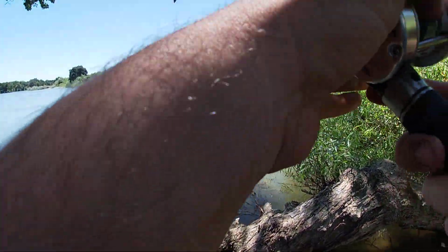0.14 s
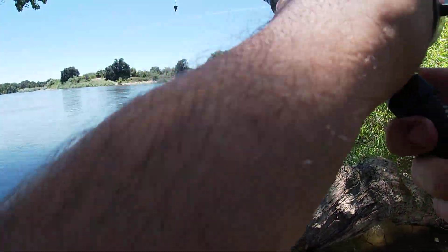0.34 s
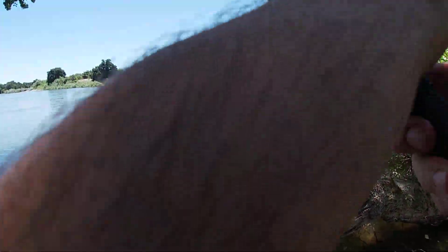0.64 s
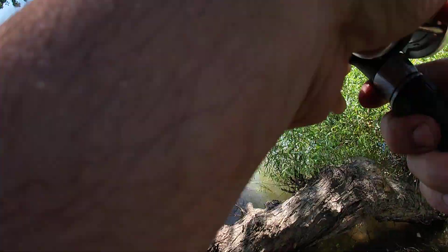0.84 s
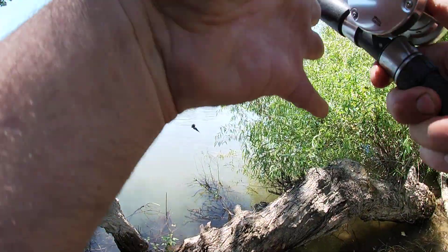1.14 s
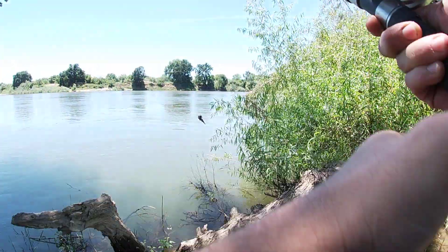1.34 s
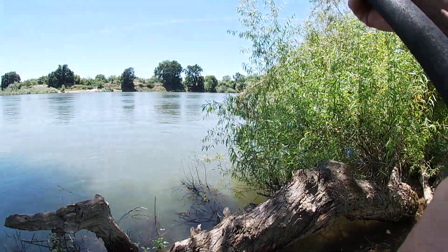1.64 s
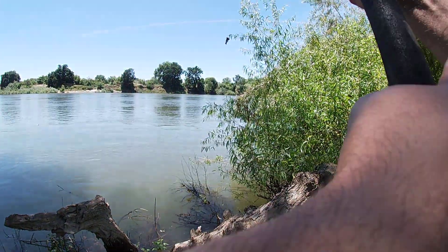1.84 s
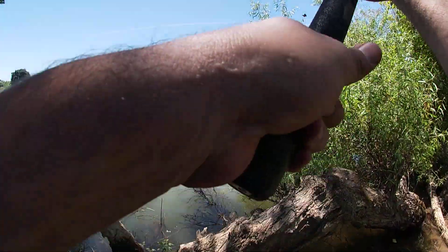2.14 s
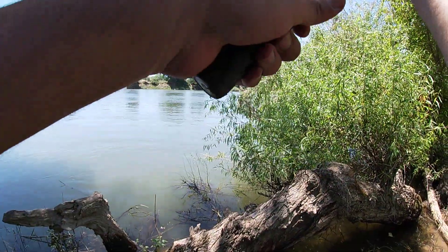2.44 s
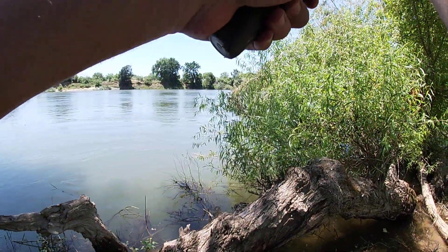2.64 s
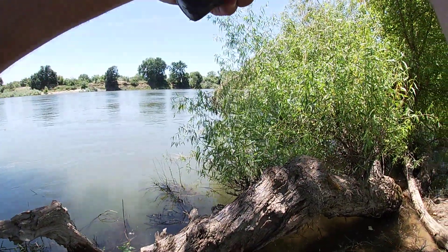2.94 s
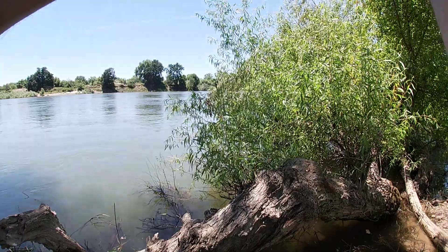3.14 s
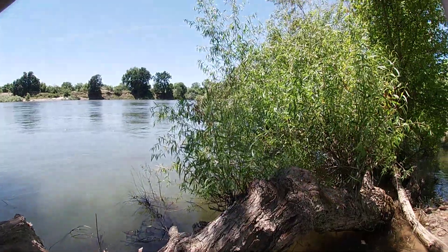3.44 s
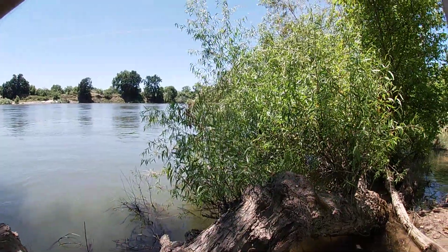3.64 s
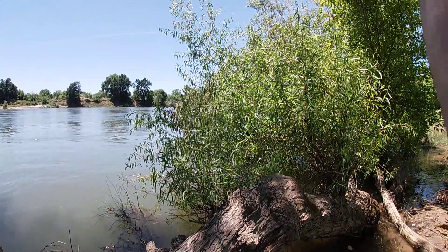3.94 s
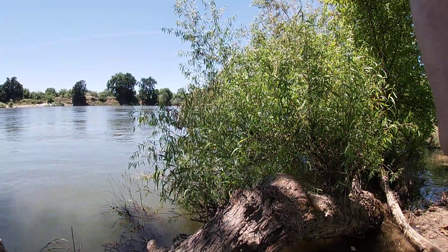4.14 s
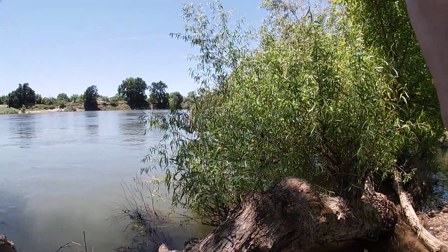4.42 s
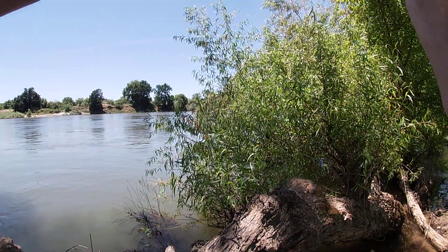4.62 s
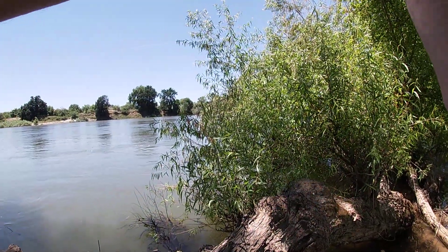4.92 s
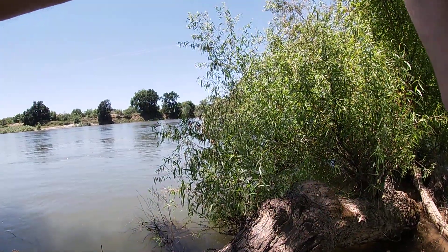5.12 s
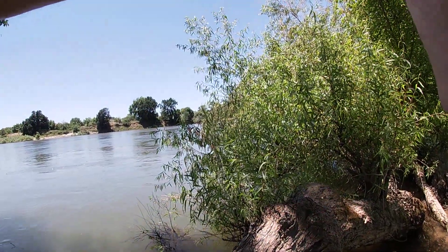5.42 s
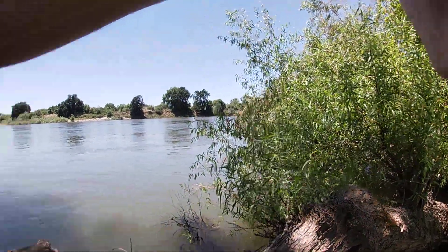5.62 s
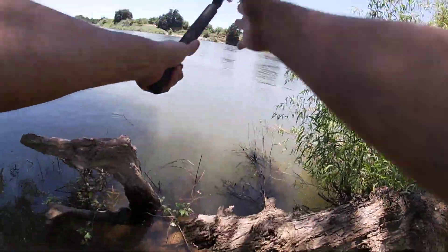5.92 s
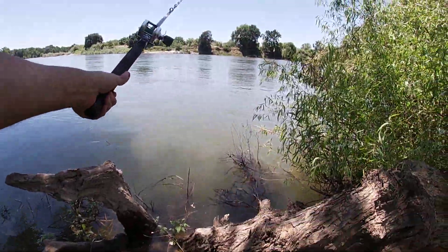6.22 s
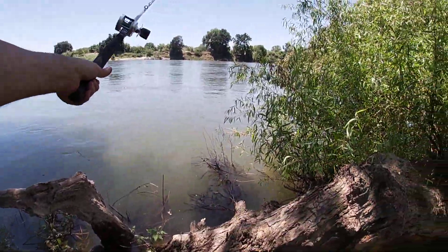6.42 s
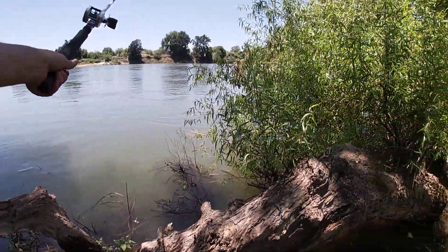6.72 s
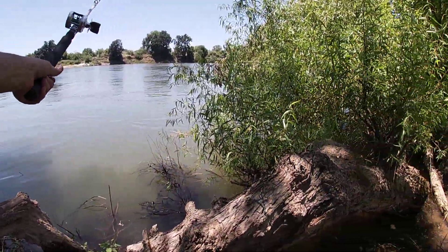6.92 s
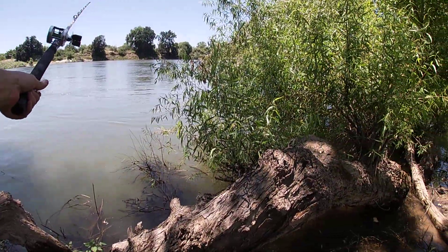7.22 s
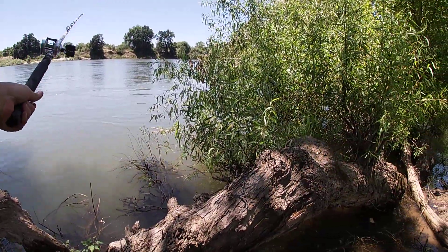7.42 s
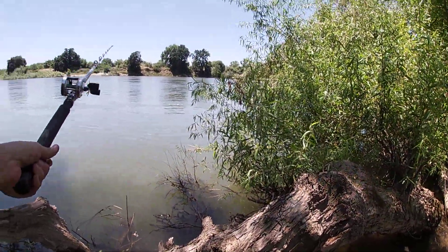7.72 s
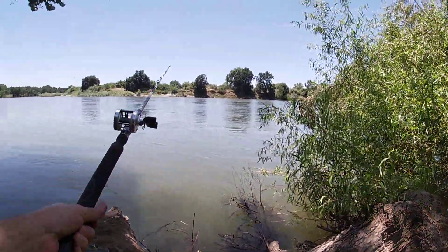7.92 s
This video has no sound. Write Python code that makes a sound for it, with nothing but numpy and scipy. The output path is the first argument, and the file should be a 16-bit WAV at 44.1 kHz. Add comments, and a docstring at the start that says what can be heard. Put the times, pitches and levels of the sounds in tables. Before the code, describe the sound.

Hands click on a fishing reel, then the rod whooshes and the spool whines, slowly falling in pitch, beside a river.

```python
"""The free spool of a fishing reel whines as it slows after a riverside cast: its gears and bearings make
tones at multiples of the rotation rate, and the metal frame radiates them through its resonances.
Before that, hands rub and tick on the reel, and the swung rod whooshes through the air.
Behind it a distant engine drones in three harmonics over wind rumble, river hiss, a faint whistle
and a thin insect band. One microphone hears it all."""
import sys
import numpy as np
from scipy import signal
from scipy.fft import rfft, irfft
from scipy.io import wavfile
from scipy.ndimage import uniform_filter1d

SR = 44100
rng = np.random.default_rng(int(sys.argv[2]) if len(sys.argv) > 2 else 0)


def bounce(signal):
    """Save signal as a 16-bit WAV file at the path given by the first command-line argument."""
    frames = np.transpose(np.atleast_2d(signal))
    limited = np.clip(frames, -1, 1)
    pcm = np.round(limited * 32767).astype(np.int16)
    wavfile.write(sys.argv[1], SR, pcm)


N = 355490
TIME = np.arange(N) / SR

# Spool speed jumps at release, then sags in shrinking surges as the rod tip nods.
# Each row: time in seconds, gear mesh frequency in Hz, mesh tone level in dB.
GEAR_MESH = [(5.97, 2800, -62), (6.01, 2950, -58), (6.04, 3650, -50), (6.07, 3990, -44), (6.1, 3944, -47),
             (6.18, 3556, -52), (6.26, 3210, -57), (6.33, 3070, -49), (6.38, 2967, -52), (6.46, 3230, -59),
             (6.51, 3400, -55), (6.56, 3270, -58), (6.6, 3138, -50), (6.65, 2990, -52), (6.76, 3133, -54),
             (6.95, 2793, -52), (7.09, 2894, -53), (7.22, 2685, -53), (7.3, 2712, -55), (7.42, 2670, -57),
             (7.59, 2598, -52), (7.73, 2655, -55), (7.86, 2604, -50.5), (8, 2630, -53), (8.06, 2470, -50)]
# Spool noise. Each row: time in seconds, whirr level in dB, sizzle and rasp in dB against the whirr.
SPOOL_NOISE = [(5.97, -43, -6, -10), (6.03, -42.5, -8, -3), (6.09, -40, -4, -2), (6.14, -42.5, -9, -2.5),
               (6.31, -44, -7, -3.5), (6.37, -46.5, -7, -4), (6.47, -44.5, -3.5, -4.5),
               (6.63, -47, 0, -2.5), (6.68, -46.5, -3.5, -2), (6.82, -46.5, -0.5, -2),
               (6.86, -50, -1, -1.5), (6.92, -48, 0, -2), (7.05, -48, 0, -3.5), (7.28, -51, -1.5, -2.5),
               (7.41, -50.5, 1.5, 0.5), (7.52, -52.5, -1.5, -3.5), (7.64, -50, 0.5, -0.5),
               (7.75, -49.5, -9, -6), (7.86, -49, -6, -1.5), (7.97, -46.5, -5, -1), (8.06, -48.5, -9, 0)]
# Resonances of the reel frame. Each row: centre in Hz, width in Hz, gain in dB.
FRAME_MODES = [(1290, 930, -1.5), (2896, 960, 9), (5560, 1300, 4), (8250, 1800, 3.5), (9820, 1100, 4.5),
               (13600, 2800, -2)]
# Bearing tones, idler gear, then clusters round mesh harmonics 2 to 4. Each entry: cycles per spool turn.
WHINE_ORDERS = [10.08, 15.12, 26 / 3, 52 / 3, 65 / 3, 104 / 3, 25, 26, 27, 39, 40, 41, 42, 50, 52, 53]
# Strength of those orders. Each row: relative level in dB, dB gained per octave of spool speed.
WHINE_LEVELS = [(-61, 32), (-62, -15), (-67, -25), (-61, 15), (-64, -45), (-65, -15), (-64, 12), (-62, 12),
                (-63, 12), (-61, -5), (-62, -5), (-66, 6), (-68, 12), (-79, -35), (-74, -35), (-74, -35)]
# Bands where the frame radiates the whine best. Each row: centre in Hz, width in Hz, gain in dB.
RADIATION_BANDS = [(2800, 1000, 0.1), (4400, 700, -1), (5300, 500, -3), (6550, 800, 5), (8300, 700, -4),
                   (10100, 500, 7)]
# Thin metal rings. Each row: resonance in Hz, width in Hz, level in dB.
RING_MODES = [(4468, 130, -64), (6950, 150, -67), (10148, 150, -68), (11660, 100, -72), (12322, 80, -76)]
# Onset of each ring. Each entry: start in seconds.
RING_STARTS = [6.9, 6.4, 6.2, 6.88, 6.88]
# Loose gears. Each row: time in seconds, levels in dB near the 2nd and the 3rd mesh harmonic.
GEAR_CHATTER = [(6.0, -59, -70), (6.08, -55, -68), (6.2, -64, -64), (6.3, -53, -63), (6.4, -53, -66),
                (6.5, -49, -62), (6.58, -51, -64), (6.7, -57, -59), (6.9, -62, -61), (7.2, -72, -59),
                (7.6, -66, -55), (8.06, -61, -60)]
# The rod's throw and rebound. Each row: time in seconds, level of the hollow whoosh in dB.
ROD_SWING = [(5.6, -65), (5.69, -55.5), (5.74, -41), (5.78, -49), (5.84, -43.5), (5.87, -50), (5.97, -51),
             (6.05, -44.5), (6.1, -45), (6.15, -53), (6.22, -51.5), (6.4, -67)]
# Ticks of fingers and clutch. Each row: start in seconds, crack peak in dB, centre in Hz,
# treble gain in dB, thud in dB against the peak, time to decay by 60 dB in seconds.
REEL_TICKS = [(0.1053, -34.5, 3670, -14, 5, 0.026), (0.264, -45, 7000, -3, -20, 0.013),
              (0.4708, -38.5, 3000, -9, -13, 0.011), (0.554, -42, 2000, -21, 1, .012),
              (0.613, -12.5, 2070, -17, -22, 0.014), (0.615, -2, 3870, 9, -30, 0.0057),
              (0.6148, -19, 8540, -12, -30, 0.0053), (0.6171, -11.5, 1160, -17.5, -11, 0.012),
              (0.76, -47, 2600, -22, -15, .012), (0.784, -28.5, 1560, -13, -11, 0.026),
              (0.843, -37, 1800, -15, -15, 0.0099), (0.917, -37, 1300, -17, -17, 0.016),
              (0.924, -45, 2700, -14, -15, .012), (0.951, -43, 1600, -20, -15, 0.011),
              (0.957, -42, 1700, -20, -15, .012), (1.005, -47, 1500, -20, -15, .012),
              (1.015, -43, 1810, -12, 10, 0.011), (1.042, -29, 4230, -28, -25, 0.0081),
              (1.075, -38, 4400, -15, -23, .012), (1.092, -37, 4300, -12, -20, .012),
              (1.0423, -26, 1620, -36, -12, 0.0055), (1.072, -29, 1520, -37, -17, .014),
              (1.11, -34, 4300, -16, -5, 0.021), (1.129, -25.5, 4300, -9, -4, 0.022),
              (1.131, -25, 2720, -4, 3, 0.052), (1.159, -27.5, 3850, -30, -27, 0.018),
              (1.171, -33, 2500, -23, -15, 0.02), (1.1895, -37, 1700, -28, -18, 0.012),
              (1.2942, -41, 4170, -2, -7, 0.0087), (2.0714, -40.5, 1380, -19, -20, 0.012),
              (2.0795, -40.5, 4330, -19, -7, 0.021), (2.118, -39.5, 1310, -22, 7.5, 0.0034),
              (3.346, -42, 7800, -12, -20, 0.02), (3.462, -38, 2700, -28, -10, 0.012),
              (3.463, -43, 1250, -28, -10, .012), (3.696, -34, 2010, -7, 5, 0.015),
              (4.208, -39, 2900, -20, -10, 0.012), (4.2085, -44, 1320, -25, -5, .012),
              (4.306, -45, 2900, -28, -20, .012), (5.724, -30, 1210, -25, -21, 0.017),
              (5.735, -38, 9000, -10, -25, .008), (5.745, -38, 11500, -10, -29, .008),
              (5.756, -21.5, 1240, -36, -15, 0.0061), (5.7842, -33, 9000, -12, -20, .01),
              (5.819, -20, 7360, 14, -21, 0.011), (5.8793, -29, 4300, 0, -22, 0.011),
              (5.87, -35, 10500, -8, -25, .01), (5.917, -32, 7260, -3, -12, 0.032),
              (5.918, -36, 13000, -15, -25, .012), (5.975, -26, 7360, -15, -20, 0.0067),
              (5.9748, -28, 3500, -15, -20, .008)]
# The reel's side plate, rung by every tick. Each row: centre in Hz, width in Hz, relative gain in dB.
PLATE_MODES = [(400, 60, 0), (800, 59, 11), (1710, 300, -4), (3800, 340, -3), (4500, 120, -17),
               (7340, 240, -33)]
# Wide noise swells: short rubs of skin and cloth, a faint high background sheen, and a long swell
# of river hiss. Each row: start in seconds, length in seconds, centre in Hz, level in dB.
NOISE_SWELLS = [(0, 0.027, 3480, -47.5), (0, 0.051, 690, -44.5), (0.018, 0.08, 6970, -82),
                (0.12, 0.074, 5370, -51.5), (0.183, 0.18, 3440, -59.5), (0.105, .24, 10400, -67),
                (0.642, 0.44, 10700, -62), (.616, 0.039, 736, -46.5), (.617, 0.036, 4020, -53),
                (0.66, 0.087, 6160, -55), (0.669, 0.066, 2620, -55.5), (0.617, 0.017, 300, -35.5),
                (0.78, 0.062, 5270, -55), (0.84, 0.043, 6000, -59), (0.904, 0.074, 1520, -63),
                (0.952, 0.054, 7200, -60), (1.095, 0.061, 6960, -60), (1.127, 0.016, 220, -40),
                (1.121, 0.013, 4500, -48), (1.682, 0.054, 7350, -51), (1.734, 0.09, 6940, -61),
                (1.894, 0.068, 4800, -52.5), (2.095, 0.21, 3880, -60.5), (3.342, 0.055, 7560, -48),
                (3.344, .045, 3300, -55), (3.521, 0.087, 8000, -65), (3.692, 0.035, 6000, -62),
                (4.12, 0.042, 7030, -60.5), (4.22, 0.073, 5770, -58.5), (4.301, 1.9, 3600, -62)]
# Line and thumb on the spool. Each row: start in seconds, length in seconds, centre in Hz, level in dB.
LINE_SQUEAKS = [(0, 0.048, 1750, -41.5), (0.597, 0.035, 5600, -48), (0.792, 0.03, 3700, -57),
                (0.852, 0.04, 3760, -49.5), (0.902, 0.028, 8300, -61), (5.758, 0.039, 5600, -50),
                (5.909, 0.018, 4240, -48.5), (5.926, 0.041, 4420, -48), (0.941, 0.091, 4330, -59),
                (1.037, .013, 6200, -55), (1.052, 0.013, 6200, -57), (1.064, 0.059, 7100, -63),
                (1.147, .02, 6870, -60), (0.787, 0.02, 5650, -61), (0.848, .04, 5300, -59),
                (0.849, 0.033, 7000, -64), (0.97, 0.031, 6450, -62), (0.962, .035, 8050, -64),
                (0.96, 0.041, 1610, -58.5), (1.085, 0.035, 1670, -54), (3.353, 0.044, 1320, -51.5),
                (3.886, 0.025, 1210, -55.5), (4.083, 0.014, 1340, -56), (7.619, 0.2, 1330, -59)]
# The engine's fundamental swells and fades as the air moves. Each row: time in seconds, level in dB.
ENGINE_FUNDAMENTAL = [(0.0, -44.5), (0.49, -34), (0.65, -50.5), (0.94, -33), (1.1, -53), (1.14, -35),
                      (1.28, -56), (1.46, -36.5), (2.02, -38), (2.11, -46.5), (2.31, -33.5), (2.69, -68),
                      (2.8, -41.5), (3.57, -46), (3.7, -30.5), (3.77, -45), (3.88, -30), (4.15, -57),
                      (4.18, -43.5), (4.44, -42.5), (4.67, -59), (4.74, -40), (4.98, -29.5), (5.5, -44.5),
                      (6.02, -40), (6.06, -71), (6.24, -42.5), (6.71, -49), (6.8, -36), (7.07, -38.5),
                      (7.16, -30), (7.39, -39), (7.59, -29), (8.06, -50)]
# Its second harmonic swells on its own. Each row: time in seconds, level in dB.
ENGINE_SECOND = [(0, -54), (1.2, -62.5), (2.9, -53), (3.5, -54.5), (4.45, -53.5), (4.6, -42), (4.9, -43),
                 (5.0, -54), (5.15, -41), (5.35, -48), (5.5, -52.5), (6.6, -57), (6.75, -47.5), (7.0, -71),
                 (7.5, -54), (8.06, -54)]
# Gusts on the microphone. Each row: time in seconds, gust strength in dB.
GUSTS = [(0.0, -49), (0.52, -51), (2.69, -52), (3.61, -41), (4.06, -53.5), (4.56, -37.5), (4.65, -53),
         (5.68, -44), (5.75, -30), (5.84, -38), (5.97, -41), (6.84, -49.5), (6.87, -37.5), (7.43, -47),
         (7.54, -35), (7.59, -40), (8.06, -42)]
# Spectrum of the river. Each row: frequency in Hz, relative gain in dB.
RIVER_SPECTRUM = [(60, -15.5), (110, -9), (200, -7), (300, -14), (550, -19.5), (1000, -26), (1400, -29.5),
                  (2200, -34), (3700, -35), (7000, -37), (10500, -42), (12500, -44.5), (13200, -60)]
# The low roar thins as the listener turns. Each row: time in seconds, gain in dB against the hiss.
RIVER_ROAR = [(0, 5.5), (.6, 4), (1.3, 1.5), (2.5, -2), (4, -0.5), (5.5, 0), (6.5, -2), (7.2, -4),
              (8.06, -5.5)]
# A faint whistle. Each row: time in seconds, frequency in Hz, level in dB.
FAINT_WHISTLE = [(.3, 915, -84), (1.1, 912, -64), (1.3, 908, -65.5), (1.95, 910, -64), (2.05, 912, -95),
                 (6.2, 931, -71), (6.5, 909, -69), (7.2, 914, -67)]
# Response of the microphone housing. Each row: frequency in Hz, gain in dB.
HOUSING_RESPONSE = [(100, 0), (6500, 0), (8400, -1), (9400, -10), (10100, -9), (11000, -17), (12500, -14),
                    (14100, -21), (14500, -30), (15700, -24)]

SPOOL_START = int((SPOOL_NOISE[0][0] - .05) * SR)  # sample index just ahead of the release
SPOOL_N = N - SPOOL_START
GEAR_TEETH, FREE_RUN_S = 13, 6.0


def spool():
    """Rotation sets every pitch: gear teeth meet at the tooth count times the spool's turning rate."""
    mesh_hz, mesh_db = uniform_filter1d(curves(GEAR_MESH), size=SR // 25)[:, SPOOL_START:]
    tug = 1 + 0.00313 * walk(90, SPOOL_N)  # the line pulls unevenly, which roughens every tone
    turns = np.cumsum(mesh_hz * tug) / SR / GEAR_TEETH
    # uneven teeth repeat every turn, giving tones at whole orders of the rotation
    flaws = sum(undb(-29.5 + 3 * walk(8, SPOOL_N)) * tone(order * turns)
                for order in range(11, 62) if order != GEAR_TEETH)
    throb = 1 + 0.14 * np.sin(2 * np.pi * turns)
    rolling = rng.standard_normal(SPOOL_N) * throb * undb(0.85 * walk(39.75, SPOOL_N))
    free = onset(FREE_RUN_S) ** 2
    whirr = frame_whirr(rolling + free * flaws)
    flicker_db = 2.2 * walk(25, SPOOL_N) + 1.5 * walk(60, SPOOL_N)
    mesh = undb(mesh_db + flicker_db) * tone(GEAR_TEETH * turns)
    running = free * (gear_chatter(turns) + whine(turns, mesh_hz))
    rings = metal_rings(0.022 * rolling + flaws)
    return gate(SPOOL_NOISE) * np.pad(whirr + mesh + running + rings, (SPOOL_START, 0))


def frame_whirr(drive):
    """Forced vibration: the frame passes the parts of the drive that lie near its resonances."""
    whirr_db, sizzle_db, rasp_db = curves(SPOOL_NOISE)[:, SPOOL_START:]
    whirr = unit(sum(undb(db) * band(drive, hz, width) for hz, width, db in FRAME_MODES))
    sizzle = undb(sizzle_db + 0.5 * walk(15, SPOOL_N)) * unit(band(drive, hz=6870, width_hz=750))
    rasp = undb(rasp_db + 0.39 * walk(11.2, SPOOL_N)) * unit(band(drive, hz=4400, width_hz=760))
    return undb(whirr_db) * (whirr + rasp + sizzle)


def gear_chatter(turns, orders=(26.3, 39.8)):
    """Random modulation: loose gears spread noise sidebands near the 2nd and 3rd mesh harmonics."""
    chatter = 0
    for db, order in zip(curves(GEAR_CHATTER)[:, SPOOL_START:], orders):
        for shift in (0, 1 / 4):  # two carriers a quarter cycle apart
            chatter += undb(db) * walk(450, SPOOL_N) * np.cos(2 * np.pi * (order * turns + shift))
    return chatter


def whine(turns, mesh_hz):
    """Resonant radiation: bearing and gear tones swell as they glide through a band of the frame."""
    octaves = np.log2(mesh_hz / 3000)
    tones = 0
    for (db, db_per_octave), order in zip(WHINE_LEVELS, WHINE_ORDERS):
        flicker_db = 4 * np.minimum(walk(13.1, SPOOL_N), .8) + 3 * walk(60, SPOOL_N)
        tones += undb(db + db_per_octave * octaves + flicker_db) * tone(order * turns)
    return 0.055 * tones + sum(undb(db) * resonate(tones, hz, width) for hz, width, db in RADIATION_BANDS)


def metal_rings(drive):
    """Sympathetic resonance: a thin ring sings when a whole order crosses its narrow mode."""
    return sum(undb(db + 5.2 * walk(14.28, SPOOL_N)) * onset(start) * unit(band(drive, hz, width))
               for (hz, width, db), start in zip(RING_MODES, RING_STARTS))


def rod_swing(peak_s=5.775, rise_db_per_s=136, fall_db_per_s=36):
    """Flow noise: the rod whooshes in a hollow, fluttering band while air hisses and a sleeve rumbles."""
    (hollow_db,) = curves(ROD_SWING)
    since_peak = TIME - peak_s
    air_db = -43 + np.minimum(rise_db_per_s * since_peak, -fall_db_per_s * since_peak)
    moving = np.interp(TIME, [5.93, 6.1], [1, 0])  # the air hiss dies as the rod stops
    air = undb(air_db + 0.67 * walk(71)) * moving * (hiss(3040, 4300) + 0.62 * hiss(11700, 8700))
    hollow = undb(hollow_db + 2.44 * walk(70)) * hiss(1265, 300)
    sleeve = undb(hollow_db - 5) * hiss(590, 840)
    return gate(ROD_SWING) * (hollow + air + sleeve)


def ticks(attack_s=.0006, thud_hz=170, thud_decay_s=0.0092):
    """Impact excitation: each tick cracks, rings the side plate and thuds through the body."""
    out = np.zeros(N)
    t = np.arange(2048) / SR
    thud = np.sin(2 * np.pi * thud_hz * t) * np.exp(-t / thud_decay_s)
    for start, db, hz, treble_db, thud_db, t60 in REEL_TICKS:
        impact = rng.standard_normal(len(t)) * undb(-60 * t / t60) * np.minimum(t / attack_s, 1)
        plate = sum(undb(mode_db) * resonate(impact, f, width) for f, width, mode_db in PLATE_MODES)
        treble = undb(treble_db) * resonate(impact, 4100, 19700)
        crack = 0.12 * plate + resonate(impact, hz, 0.16 * hz) + treble
        add(out, start, undb(db) * (crack / np.abs(crack).max() + undb(thud_db) * thud))
    return out


def squeaks():
    """Sliding friction: line and thumb squeak on the spool in narrow bands of noise."""
    out = np.zeros(N)
    for start, length, hz, db in LINE_SQUEAKS:
        add(out, start, undb(db) * burst(length, hz, width_hz=330))
    return out


def noise_swells():
    """Wideband noise under an envelope: short rubs, a faint background sheen, a swell of river hiss."""
    out = np.zeros(N)
    for start, length, hz, db in NOISE_SWELLS:
        body = burst(length, hz, width_hz=hz)
        sheen = undb(-6.5) * min(hz / 5000, 1) ** 2 * burst(length, hz=11500, width_hz=5300)
        add(out, start, undb(db) * (body + sheen))
    return out


def engine(start_hz=98.46, sag_hz_per_s=1.2):
    """Propagation through moving air makes the three harmonics of a distant engine waver."""
    levels_db = [curves(ENGINE_FUNDAMENTAL)[0] + 0.28 * walk(13),
                 curves(ENGINE_SECOND)[0] + 2 * walk(20),
                 -63 + 1.55 * walk(4.9)]
    hz = (start_hz - sag_hz_per_s * TIME) * (1 + 0.012 * walk(25))
    cycles = np.cumsum(hz) / SR
    return sum(undb(db + 2.06 * walk(29)) * tone(k * cycles) for k, db in enumerate(levels_db, 1))


def wind(calm_db=-47.5, flutter_share=0.52):
    """Turbulent pressure buffets the microphone in two low bands; the upper follows gusts only in part."""
    (gust_db,) = curves(GUSTS)
    buffet = undb(gust_db - 1.5 + 3 * walk(8.1)) * hiss(32.5, 38)
    flutter_db = calm_db + flutter_share * (gust_db - calm_db) + 2
    return buffet + undb(flutter_db + 3 * walk(18)) * hiss(64.4, 50)


def river(crossover_hz=900):
    """Broadband flow noise: the water's low roar and smooth hiss swell independently."""
    water = colour(rng.standard_normal(N), RIVER_SPECTRUM)
    low = signal.sosfilt(signal.butter(1, crossover_hz, fs=SR, output="sos"), water)
    roar = undb(curves(RIVER_ROAR)[0] + 1.3 * walk(3)) * low
    high = undb(.5 * walk(1.8)) * (water - low)
    return undb(-21) * (roar + high)


def whistle():
    """A faint pure tone, slightly modulated in amplitude and frequency."""
    hz, db = curves(FAINT_WHISTLE)
    return gate(FAINT_WHISTLE) * undb(db + 1.5 * walk(12)) * tone(np.cumsum(hz) / SR)


def insect(peak_s=3, span_s=.6):
    """Narrowband noise: a thin, flickering insect call swells and fades once."""
    swell = np.exp(-((TIME - peak_s) / span_s) ** 2)
    return swell * undb(-76 + 2 * walk(4.7)) * hiss(6700, 250)


def undb(db):
    """Decibels to amplitude gain."""
    return 10 ** (np.asarray(db) / 20)


def unit(x):
    """Normalisation to rms 1."""
    return x / np.sqrt(np.mean(x ** 2))


def curves(table):
    """Linear interpolation in time of each column after the first."""
    times, *columns = np.transpose(table)
    return np.array([np.interp(TIME, times, column) for column in columns])


def gate(table, fade_s=.03):
    """A window open over the table's time span, fading just outside it."""
    return np.clip(np.minimum(TIME - table[0][0], table[-1][0] - TIME) / fade_s + 1, 0, 1)


def onset(start_s, rise_s=0.029):
    """A linear rise from 0 to 1 on the spool's stretch of time."""
    return np.clip((TIME[SPOOL_START:] - start_s) / rise_s, 0, 1)


def resonate(x, hz, width_hz):
    """A second-order resonance, gain 1 at its centre."""
    return signal.lfilter(*signal.iirpeak(hz, hz / width_hz, fs=SR), x)


def band(x, hz, width_hz):
    """Two equal resonances in cascade, for steeper skirts."""
    return resonate(resonate(x, hz, width_hz), hz, width_hz)


def hiss(hz, width_hz, size=N):
    """Band-pass noise of rms 1."""
    return unit(band(rng.standard_normal(size), hz, width_hz))


def burst(length, hz, width_hz):
    """Band-pass noise whose envelope swells quickly, holds and fades."""
    settle = 8192  # samples dropped while the filter settles
    noise = hiss(hz, width_hz, settle + int(1.2 * length * SR))[settle:]
    progress = np.arange(len(noise)) / SR / length
    return noise * np.clip(4 * progress, 0, 1) ** 0.28 * np.clip(2.7 * (1.1 - progress), 0, 1)


def walk(rate, size=N):
    """A random modulator gliding between `rate` values a second; spread near 1."""
    hold = int(SR / rate)
    steps = np.repeat(rng.standard_normal(size // hold + 1), hold)
    return 1.125 * uniform_filter1d(steps, hold)[:size]


def tone(cycles):
    """A sinusoid of rms 1 with a random starting phase."""
    return np.sqrt(2) * np.sin(2 * np.pi * (cycles + rng.random()))


def colour(x, points):
    """Spectral shaping by (Hz, dB) points joined on a log frequency axis."""
    hz = np.maximum(np.fft.rfftfreq(N, 1 / SR), 1)
    point_hz, db = np.transpose(points)
    return irfft(rfft(x) * undb(np.interp(np.log(hz), np.log(point_hz), db)), N)


def add(out, start_s, sound):
    """Superposition of a sound onto out, from start_s on."""
    i = int(start_s * SR)
    out[i:i + len(sound)] += sound[:N - i]


def scene():
    """Superposition: all sources sum at one microphone, which feeds both channels."""
    background = river() + insect() + engine() + wind() + whistle()
    mono = background + spool() + rod_swing() + ticks() + noise_swells() + squeaks()
    return np.array([mono, mono])


def record(dry, cutoff_hz=15700):
    """Filtering: the housing dulls the treble in steps, and a steep low-pass cuts off the top."""
    lowpass = signal.ellip(8, .2, 80, cutoff_hz, fs=SR, output="sos")
    return signal.sosfilt(lowpass, colour(dry, HOUSING_RESPONSE))


dry = scene()
out = record(dry)
bounce(out)
```